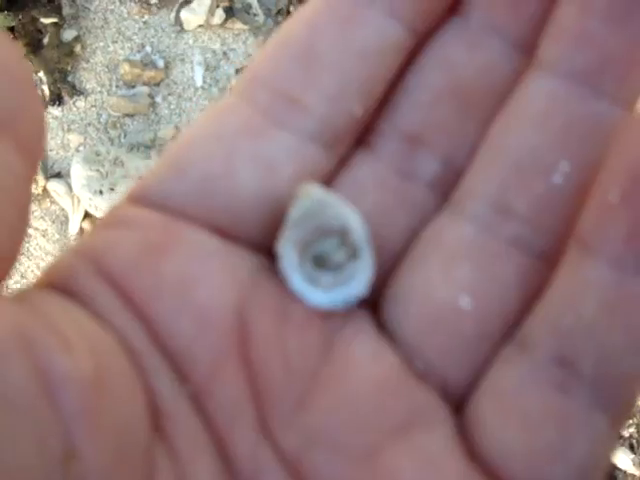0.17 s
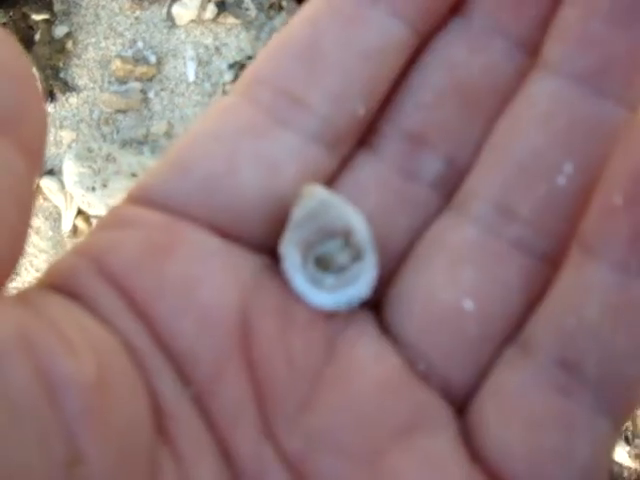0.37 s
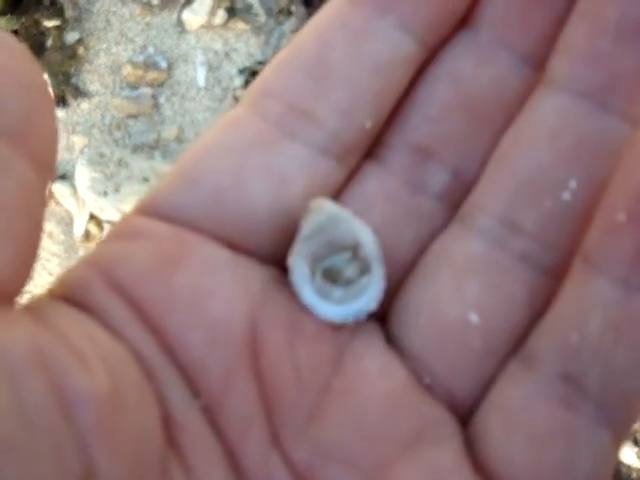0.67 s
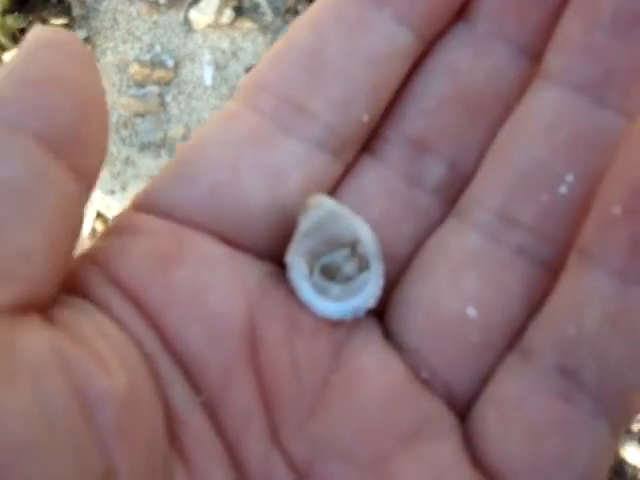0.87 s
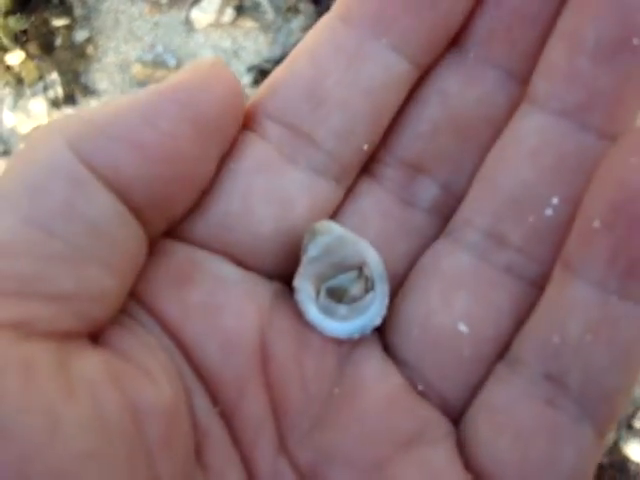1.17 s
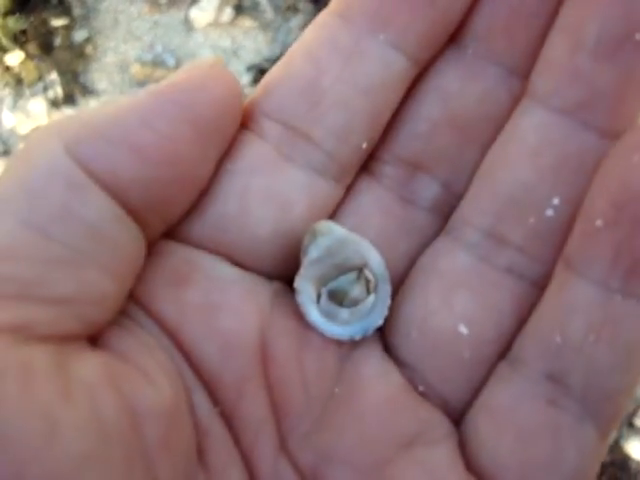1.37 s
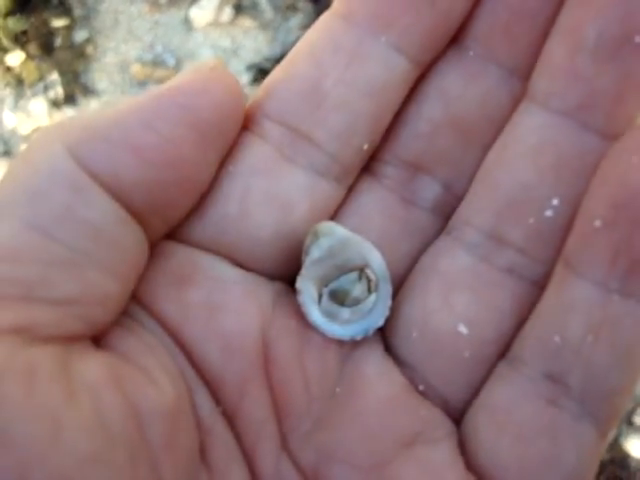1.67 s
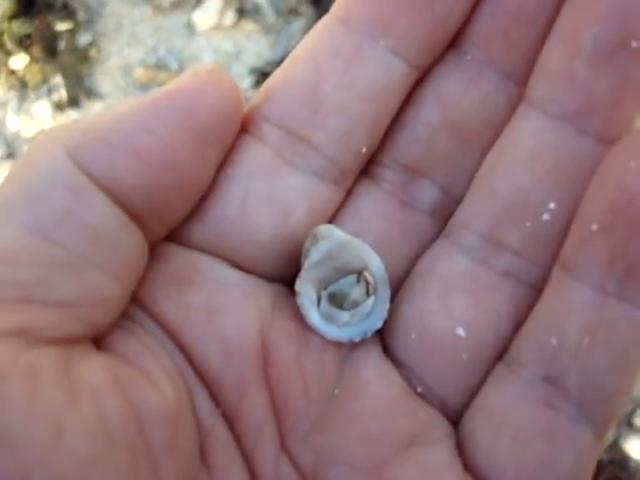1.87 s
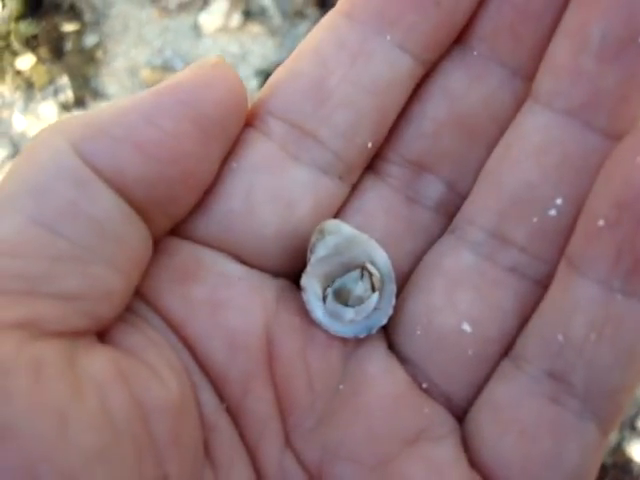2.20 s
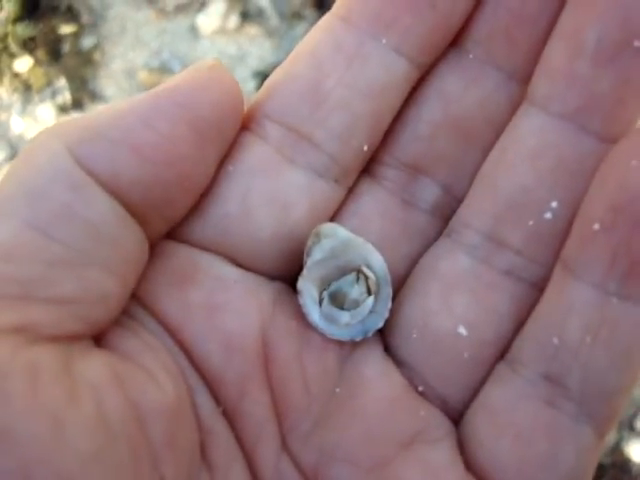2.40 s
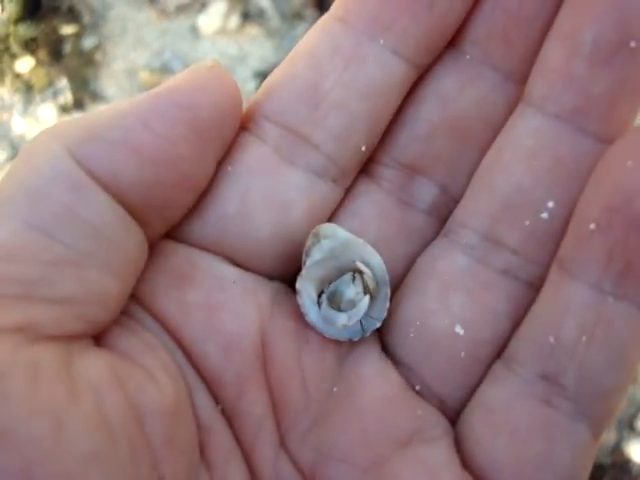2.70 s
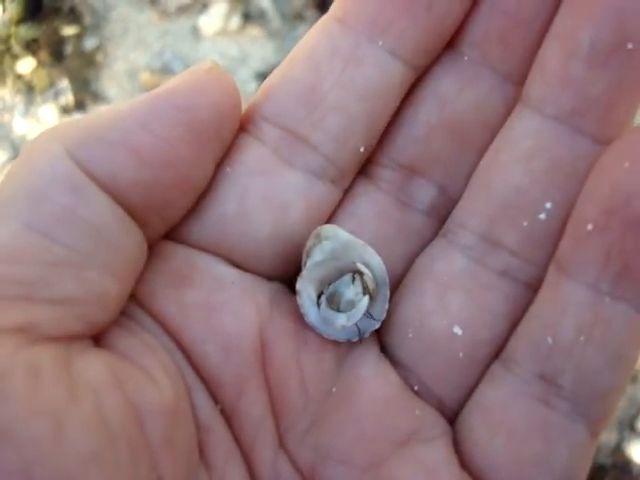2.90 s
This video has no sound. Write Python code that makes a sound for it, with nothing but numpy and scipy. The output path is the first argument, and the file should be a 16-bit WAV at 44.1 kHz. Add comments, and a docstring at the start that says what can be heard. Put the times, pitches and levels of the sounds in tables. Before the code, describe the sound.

Water swells from a quiet rush to a bubbly, low-mid roar about a third of the way through, rolls deeper, then fades to thin foam; dull electrical thumps dot the close, dry beach pickup.

```python
"""After a moment of silence: a soft low thump and a faint flutter, over a swelling rush of water.
One small wave runs up a beach of sand and pebbles: the crest spills with a rush, the water tumbles
with a hollow roar and rolls on, then foam fizzes and eases. Wave and background are shaped noise;
bubbles and grit are showers of damped rings; electronic leakage adds decaying steps and pulse runs."""
import sys
import numpy as np
from scipy import signal
from scipy.fft import rfft, irfft, next_fast_len
from scipy.io import wavfile
from scipy.ndimage import uniform_filter1d, map_coordinates

SR = 44100
rng = np.random.default_rng(int(sys.argv[2]) if len(sys.argv) > 2 else 0)


def bounce(signal):
    """Save signal as a 16-bit WAV file at the path given by the first command-line argument."""
    frames = np.transpose(np.atleast_2d(signal))
    limited = np.clip(frames, -1, 1)
    pcm = np.round(limited * 32767).astype(np.int16)
    wavfile.write(sys.argv[1], SR, pcm)


N = 134505

# Low rumble and patchy hiss spectra: f/Hz, relative level/dB
RUMBLE_SPECTRUM = [(25, -18), (48, -13), (66, 1.5), (80, -4.5), (130, -9), (170, -9.5), (230, -7.5),
                   (500, -32)]
HISS_SPECTRUM = [(500, -1), (3000, -6), (9500, 4)]
RUMBLE_DB, HISS_DB = -58, -61

# Supply steps heard as thumps: t/s, signed height before rise and decay (full scale = 1)
THUMP_STEPS = [(.078, 0.011), (.268, 0.0012), (1.109, 0.015), (1.462, -0.014), (1.72, -0.0066),
               (2.011, .016), (2.149, -0.015), (2.415, -.004), (2.609, 0.017), (2.75, -.014),
               (3.017, -0.0028)]
# Runs of flutter pulses: start t/s, pulse level before filtering/dB
FLUTTER_RUNS = [(.078, -41.5), (1.51, -46), (2.211, -42), (2.81, -41)]
THUMP_RISE_S, THUMP_FALL_S = 0.0019, 0.028  # time constants
PULSE_RATE_HZ, PULSE_S, FLUTTER_S = 30, 0.0027, 0.208

# Level of each part of the wave, before wobble: t/s, level/dB
FOAM_LEVEL = [(.08, -53.5), (.4, -49.5), (.7, -45.5), (1.0, -41.5), (1.3, -44.5), (1.6, -46.5), (1.95, -48),
              (2.4, -52), (2.7, -54.5), (3.05, -56.5)]
ROLL_LEVEL = [(.08, -51), (.3, -48.5), (.65, -45), (.9, -43), (1.15, -39), (1.45, -39), (1.7, -45.5),
              (1.95, -50), (2.2, -52), (2.6, -56), (3.05, -57.5)]
SPILL_LEVEL = [(.08, -46.5), (.3, -42.5), (.44, -40.5), (.52, -38), (.66, -35.5), (1.05, -36.5),
               (1.4, -38.5), (1.7, -41), (2.0, -44), (2.4, -48.5), (2.7, -52.5), (3.05, -54)]
TUMBLE_LEVEL = [(.08, -52), (.45, -48), (.65, -39), (.77, -37), (.84, -31), (1.06, -32.5), (1.2, -33.5),
                (1.42, -34.5), (1.52, -42), (1.9, -44.5), (2.2, -50), (2.6, -55), (3.05, -53.5)]
# Noise spectrum of each part: f/Hz, relative level/dB
FOAM_SPECTRUM = [(300, -26), (1200, -9), (2700, 0), (4000, -0.5), (5200, -3), (7000, -6), (10000, -13.5)]
ROLL_SPECTRUM = [(30, -36), (60, -15.5), (85, -13), (115, -4.5), (170, -1.5), (212, 0.5), (250, -3.5),
                 (400, -15), (1000, -34)]
SPILL_SPECTRUM = [(60, -39), (300, -8.5), (600, -10.5), (780, -4.5), (880, -1.5), (990, -2.5), (1150, -5),
                  (1450, -6), (1700, -9), (2000, -9), (2350, -13.5), (3600, -17), (5000, -29.5),
                  (10000, -34)]
TUMBLE_SPECTRUM = [(60, -44.5), (115, -16.5), (175, -13.5), (215, -4.5), (248, -4), (287, 0.5), (370, -.5),
                   (490, -2.5), (680, -5.5), (1000, -15), (2000, -33), (8000, -52)]

# Rings: count per s, level re the noise, median pitch, cycles to decay 40 dB
GRIT_PER_S, GRIT_DB, GRIT_HZ, GRIT_CYCLES = 810, -8, 4200, 2.2
BUBBLES_PER_S, BUBBLE_DB, BUBBLE_HZ, BUBBLE_CYCLES = 500, -6, 991, 10.2

START_S, TOP_HZ = 0.078, 10100  # end of the opening silence; band limit


def amp(db):
    """Decibels to gain."""
    return 10 ** (np.asarray(db) / 20)


def unit(x):
    """Scale to rms 1."""
    return x / np.sqrt(np.mean(x ** 2) + 1e-20)


def curve(rows):
    """Interpolate (t/s, value) rows to one value per sample."""
    return np.interp(np.arange(N) / SR, *np.transpose(rows))


def wobble(rate_hz):
    """Smooth random curve with rate_hz knots a second."""
    knots = rng.standard_normal(int(N * rate_hz / SR) + 4)
    return map_coordinates(knots, [np.arange(N) * rate_hz / SR])


def filtered(x, response):
    """Apply a frequency response by zero-padded FFT."""
    m = next_fast_len(N + SR // 2)
    hz = np.fft.rfftfreq(m, 1 / SR)
    return irfft(rfft(x, m) * response(hz), m)[..., :N]


def patchy_noise(spectrum, patchy_db):
    """Coloured noise, rms 1, with random gain patches in time and frequency."""
    z = signal.stft(rng.standard_normal(N), nperseg=512)[2]
    field = uniform_filter1d(rng.standard_normal(z.shape), size=5, axis=0)
    field = uniform_filter1d(field, size=10, axis=1)
    noise = signal.istft(z * amp(patchy_db * unit(field)), nperseg=512)[1][:N]
    hz, db = np.transpose(spectrum)
    return unit(filtered(noise, lambda f: amp(np.interp(np.log(f + 1), np.log(hz), db))))


def grains(per_s, centre_hz, spread, cycles, size_db, rise):
    """Shower of short damped rings of random time, pitch and size, rms 1."""
    count = int(per_s * N / SR)
    when, size = rng.random((count, 2)).T
    hz = np.clip(centre_hz * np.exp(spread * rng.standard_normal(count)), 150, TOP_HZ)
    k = np.arange(SR // 40)
    age = hz[:, None] * k / SR / cycles  # 1 = decayed by 40 dB
    phase = 2 * np.pi * cycles * age * (1 + rise * age / 2)  # pitch climbs with age if rise > 0
    rings = np.sin(phase) * np.exp(-np.log(100) * age)
    gain_db = -size_db * np.log(np.maximum(size, 1 / count))  # many small, few large
    rings *= amp(gain_db)[:, None]
    where = (when * N).astype(int)[:, None] + k
    return unit(np.bincount(where.ravel(), rings.ravel(), N)[:N])


def background():
    """Faint rumble and hiss: two coloured noises at fixed mean levels, the hiss patchy."""
    rumble = amp(RUMBLE_DB) * patchy_noise(RUMBLE_SPECTRUM, patchy_db=0.5)
    hiss = amp(HISS_DB) * patchy_noise(HISS_SPECTRUM, patchy_db=-4.5)
    return rumble + hiss


def thumps():
    """Supply steps leak away: fast exponential rise, slower exponential decay."""
    t, out = np.arange(N) / SR, np.zeros(N)
    for start_s, height in THUMP_STEPS:
        age_s = np.maximum(t - start_s, 0)
        out += height * (1 - np.exp(-age_s / THUMP_RISE_S)) * np.exp(-age_s / THUMP_FALL_S)
    return out


def flutter():
    """Short runs of rectangular pulses through first-order high-pass and low-pass leakage."""
    def leakage(f):
        corner_hz = 1 / (2 * np.pi * THUMP_FALL_S)
        high_pass = 1j * f / (1j * f + corner_hz)
        return high_pass / (1 + 1j * f / 700)  # low-pass corner, Hz

    t, out = np.arange(N) / SR, np.zeros(N)
    for start_s, db in FLUTTER_RUNS:
        pulse_on = (t - start_s) % (1 / PULSE_RATE_HZ) < PULSE_S
        run_on = (t > start_s) * (t < start_s + FLUTTER_S)
        out += amp(db) * filtered(pulse_on * run_on, leakage)
    return out


def foam():
    """Foam hisses as high noise; grit and bursting bubbles tick as heavily damped rings."""
    level_db = curve(FOAM_LEVEL) + 0.29 * wobble(24.97)
    ticks = grains(GRIT_PER_S, GRIT_HZ, spread=0.32, cycles=GRIT_CYCLES, size_db=2.0, rise=0)
    return amp(level_db) * (patchy_noise(FOAM_SPECTRUM, patchy_db=1) + amp(GRIT_DB) * ticks)


def roll():
    """The body of water rolls on: a deeper, slower swell of low noise."""
    level_db = curve(ROLL_LEVEL) + 0.4 * wobble(13)
    return amp(level_db) * patchy_noise(ROLL_SPECTRUM, patchy_db=0.74)


def spill():
    """The crest spills: mid-range noise plus small bubbles ringing with rising pitch."""
    level_db = curve(SPILL_LEVEL) + 0.35 * wobble(18)
    bubbles = grains(BUBBLES_PER_S, BUBBLE_HZ, spread=0.429, cycles=BUBBLE_CYCLES, size_db=1.5, rise=0.11)
    return amp(level_db) * (patchy_noise(SPILL_SPECTRUM, patchy_db=0.4) + amp(BUBBLE_DB) * bubbles)


def tumble():
    """The wave falls over and its trapped air roars: noise peaked in the low mids."""
    level_db = curve(TUMBLE_LEVEL) + 0.53 * wobble(21)
    return amp(level_db) * patchy_noise(TUMBLE_SPECTRUM, patchy_db=0.17)


def scene():
    """Sum all sources; both channels are identical."""
    leakage = thumps() + flutter()
    wave = foam() + roll() + spill() + tumble()
    return np.tile(background() + leakage + wave, (2, 1))


def record(dry):
    """Silence up to START_S, then a sharp cut of everything from TOP_HZ up."""
    started = np.arange(N) / SR > START_S
    return filtered(dry * started, lambda hz: hz < TOP_HZ)


dry = scene()
out = record(dry)
bounce(out)
```